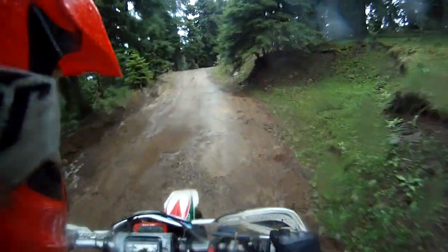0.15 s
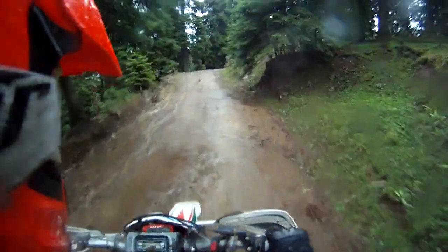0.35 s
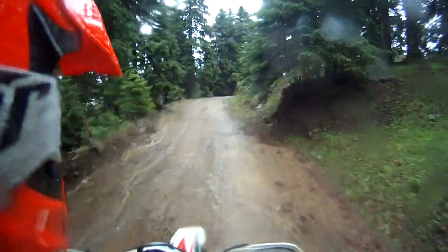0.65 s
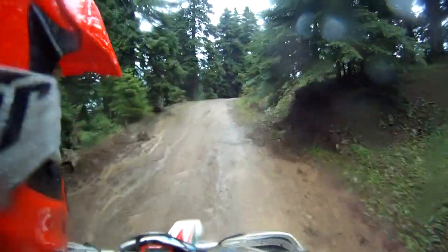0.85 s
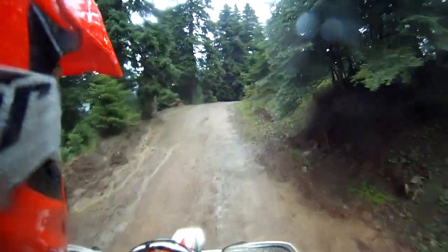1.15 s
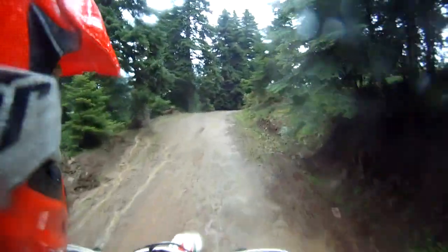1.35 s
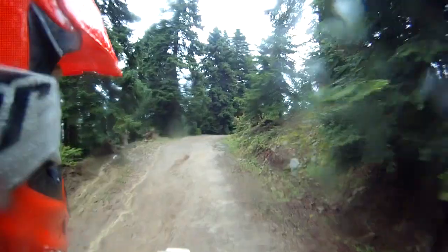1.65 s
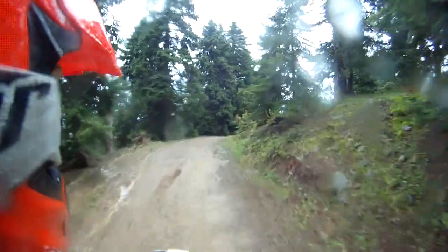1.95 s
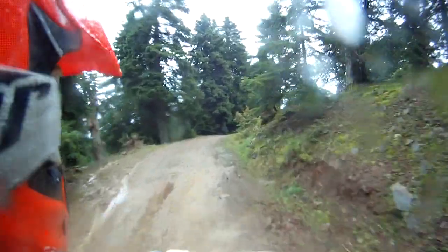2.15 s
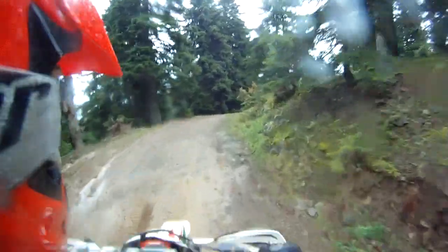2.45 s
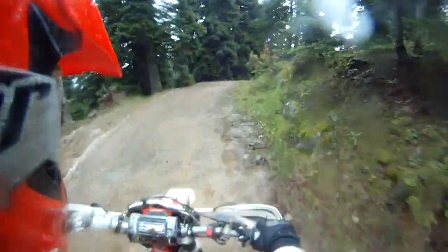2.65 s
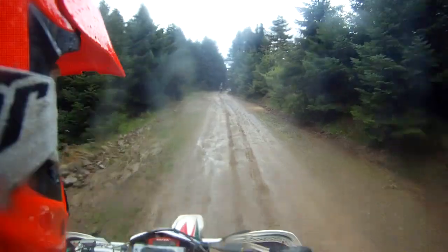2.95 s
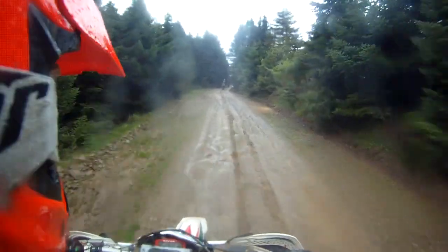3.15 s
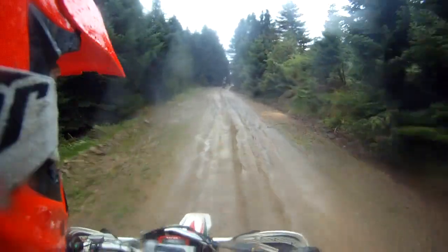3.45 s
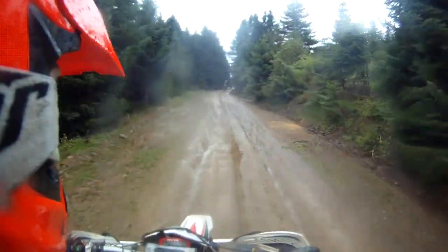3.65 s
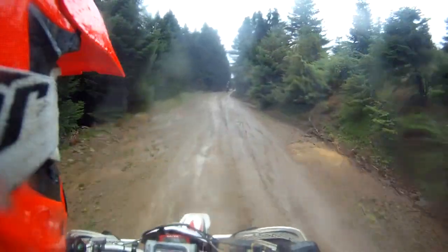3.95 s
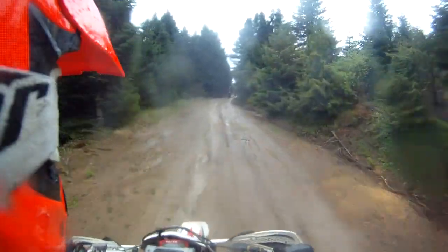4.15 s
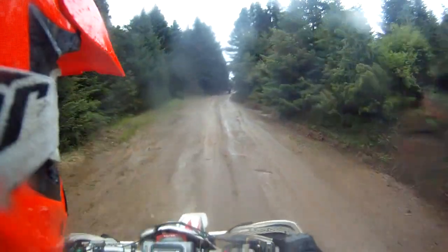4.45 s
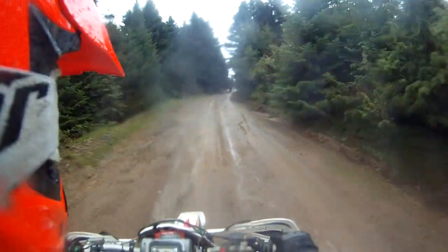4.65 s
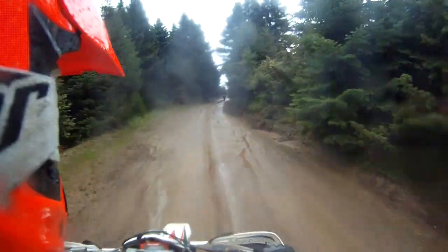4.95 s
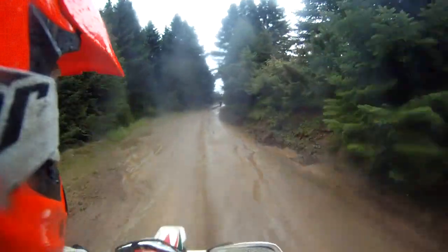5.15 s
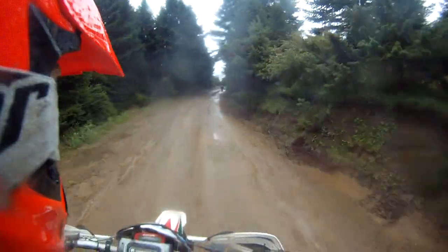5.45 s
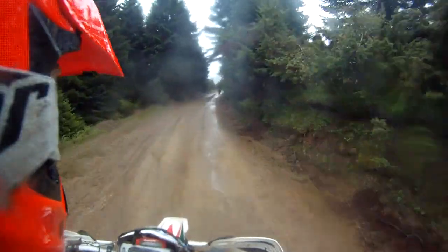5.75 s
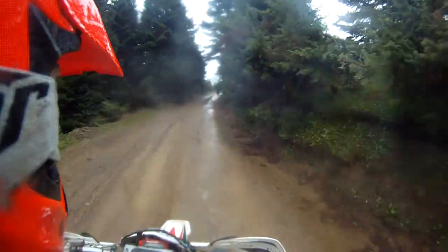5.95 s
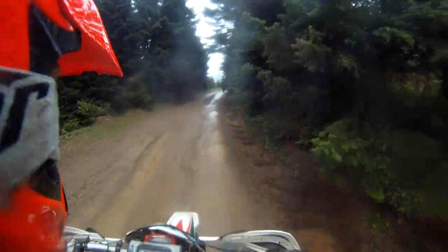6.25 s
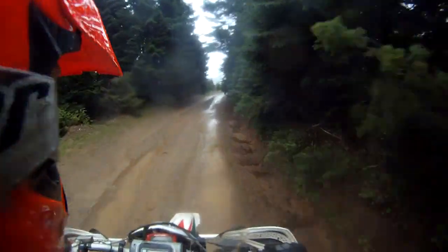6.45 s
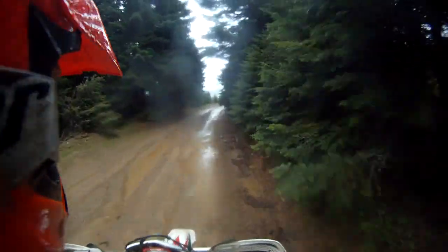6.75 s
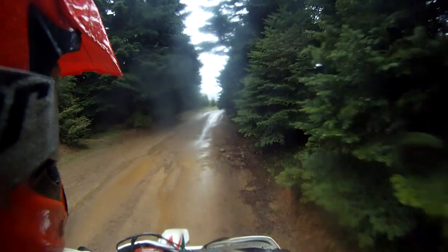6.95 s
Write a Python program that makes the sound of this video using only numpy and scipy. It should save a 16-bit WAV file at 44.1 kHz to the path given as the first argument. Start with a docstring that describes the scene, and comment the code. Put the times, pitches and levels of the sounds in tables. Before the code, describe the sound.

A trail bike rides through wet woods. At first its engine sputters and revs in short bursts over low wind rumble and faint hiss. Then the ride suddenly quickens: tyres hiss and drone, the helmet edge sings in breathy gusts, and drops and spray tap the boxed-in helmet microphone. A final throttle pull roars, then eases. Trees return a short diffuse echo.

```python
"""Dirt bike in wet woods

A two-stroke on a forest track, heard from a helmet camera in a waterproof case; faster from 2.85 s.
The engine is one pulse per turn ringing pipe and airbox: it pops, coasts, then pulls again.
Filtered noise makes the wind, the singing helmet edge and the tyre hiss; sines make the knob drone.
Drops are short bursts of force that ring the case wall."""
import sys
import numpy as np
from scipy import signal
from scipy.fft import rfft, irfft, next_fast_len
from scipy.io import wavfile
from scipy.ndimage import uniform_filter1d, map_coordinates

SR = 44100
rng = np.random.default_rng(int(sys.argv[2]) if len(sys.argv) > 2 else 0)


def generate_wav(sig):
    """Save sig (samples, or channels by samples) to the path in sys.argv[1] as 16-bit PCM at SR."""
    pcm = np.round(np.clip(np.atleast_2d(sig).T, -1, 1) * 32767).astype(np.int16)
    wavfile.write(sys.argv[1], SR, pcm)


N = 312669
TIME = np.arange(N) / SR

# resonances and notches of the camera case: f/Hz, width/Hz, level/dB
CASE_MODES = [(297, 17, 3.5), (940, 68, 2), (1253, 51, 6), (1802, 404, 4.5), (2657, 146, 4.5),
              (3557, 112, 6), (4720, 165, 3.5), (6004, 385, -15.5), (7370, 210, 3), (8460, 123, 8),
              (9230, 120, 5.5), (10160, 130, 4), (11490, 420, -16), (12290, 220, -22.5), (14470, 350, 9.5)]

# strength of the eddies at the case, before their flutter: t/s, level/dB
BUFFET_LEVEL = [(0.0, -43), (0.15, -36), (0.78, -39), (1.02, -31.5), (1.14, -42.5), (1.38, -30.5),
                (1.53, -42), (2.19, -39.5), (2.64, -35), (2.76, -43), (2.88, -35.5), (3.36, -37.5),
                (3.51, -34.5), (4.35, -33.5), (4.62, -41), (5.76, -41), (6.09, -34), (6.45, -34.5),
                (6.84, -44.8), (7.08, -36)]
# colour of the slow eddies: f/Hz, level/dB
EDDY_COLOUR = [(6, -51), (16, -1.5), (28, 1.5), (48, 1), (56, -6.5), (66, -30), (120, -46), (400, -78)]
# colour of the air rush: f/Hz, level/dB
RUSH_COLOUR = [(40, 0), (90, 4.5), (140, -2.5), (210, -4.5), (400, -10), (800, -17), (1500, -24),
               (5000, -57)]
# resonances of the helmet's edge: f/Hz, level/dB
EDGE_COLOUR = [(1100, -31), (1450, -10.5), (1620, -1.5), (1830, -1), (1960, -2), (2120, -17.5),
               (2600, -13.5), (8000, -32.5), (10200, -15.5), (12000, -31), (13850, -19.5), (15000, -38)]
# gusts that make the edge sing: t/s, length/s, starting level/dB before rise and flutter
EDGE_GUSTS = [(2.828, 0.18, -35.5), (3.102, 0.25, -35), (3.488, 0.39, -34), (3.91, 0.5, -33),
              (4.375, 0.19, -35), (4.679, 0.35, -36.5), (5.283, 0.043, -42), (5.36, 0.048, -33),
              (5.463, 0.047, -34.5), (5.595, 0.16, -40), (6.175, 0.068, -34), (6.355, .38, -41),
              (6.89, .07, -39.5)]

# hiss of the wet track, before its flutter: t/s, level/dB
WET_LEVEL = [(0, -53), (1.4, -54.5), (2.84, -52), (2.88, -45), (4.3, -44), (5.8, -46), (6.3, -42.5),
             (7.09, -47.5)]
# colour of the tyre hiss: f/Hz, level/dB
HISS_COLOUR = [(200, -19), (600, -3), (1000, -1), (1500, 1), (2300, -1.5), (3100, -1), (4200, -7.5),
               (5500, -14), (8000, -15.5), (15000, -51)]
# colour of the fine spray: f/Hz, level/dB
SPRAY_COLOUR = [(2000, -44), (5000, -7), (7000, -4.5), (9000, 3), (11000, 4), (14000, -3.5), (15200, 0)]
# beat of the tyre knobs, before its drift: t/s, f/Hz
TREAD_BEAT = [(2.87, 46.6), (3.4, 47.88), (3.8, 45.6), (4.1, 45.88), (4.6, 44.3), (5.2, 45.23), (5.6, 44.5),
              (6.35, 46.1), (7.09, 45.3)]
# harmonics of the knob beat: multiple, relative level/dB
TREAD_HARMONICS = [(2, 1.5), (3, 2), (4, -2), (5, -6.5), (7, -3.5), (8, -9), (13, -7.5)]

# drops on the case: t/s, peak level/dB, pitch f/Hz, thud weight near 1 kHz/dB, snap weight near 6 kHz/dB
CASE_DROPS = [(0.458, -31.5, 2760, -10, -24), (1.184, -23.5, 1590, 11, -41), (1.226, -35, 1040, 10, -24),
              (1.316, -32, 1600, 11, -29), (1.484, -21.5, 2530, -3, -22), (1.522, -20, 2020, 1.5, -41),
              (2.008, -18.5, 1980, -6.5, -49), (2.032, -33, 1990, 2, -34), (2.259, -25.5, 3460, -21, -12),
              (2.439, -26, 1400, -6, -36), (2.489, -30.5, 1680, 6, -14), (2.76, -23, 5100, -3.5, -6),
              (2.858, -23, 1850, 2, -26), (2.942, -18, 1660, -1, -17), (2.975, -11, 1580, -14.5, -35.5),
              (3.064, -6.5, 4300, -12, -5), (3.098, 1.5, 3450, -12.5, -22), (3.13, -22.5, 2520, -21, -12),
              (3.188, -20.5, 1580, 1, -14), (3.506, -23, 1950, -5, -18), (3.586, -15.5, 1680, -14, -29),
              (3.609, -23, 5100, -20, -1), (3.738, -8.5, 2210, -7.5, -7), (4.013, -15.5, 1650, 1.5, -44),
              (4.066, -21, 1540, 23, -23), (4.118, -20, 3500, -13, -15), (4.383, -13.5, 1790, 0.5, -41),
              (4.584, -25, 900, 17, -25), (5.245, -20, 1620, -10, -17), (5.301, -16, 2040, -7.5, -20),
              (5.621, -28, 3520, -8, -11), (6.548, -20, 1600, -10, -26), (6.718, -18, 2550, -10.5, -33)]

# engine speed, before its drift: t/s, firing rate f/Hz
FIRING_RATE = [(0, 52.5), (.4, 52.7), (.64, 61), (.8, 57.5), (.95, 53), (2.05, 54.3), (2.82, 52.5),
               (2.87, 64), (3.4, 64.4), (4, 61.8), (5.65, 59.3), (6.44, 64), (7.09, 60)]
# twists of the throttle: t/s, hold/s, opening 0-1
THROTTLE_TWISTS = [(-.1, 0.68, .42), (.45, 0.17, 0.94), (.95, 0.225, 0.57), (5.69, .79, .45),
                   (5.78, .67, 0.96)]
# runs of hard firing on every second turn under light load: t/s of the first, length/s, mean level/dB
HARD_POPS = [(.032, .055, -28.5), (.144, .135, -29), (.316, .09, -29.5), (.429, .092, -25.5),
             (.553, .05, -29), (0.637, .02, -29), (1.008, .055, -30.5), (1.103, .06, -28.5),
             (1.608, .02, -34), (1.745, .02, -32.5), (1.904, .02, -35), (2.054, .02, -36),
             (2.474, .02, -35), (5.752, .02, -32), (5.801, .02, -27.5), (5.848, .09, -26.5),
             (6.952, .05, -33.5)]
# colour of the exhaust pipe: f/Hz, level/dB
PIPE_COLOUR = [(40, -30), (120, -11.5), (178, 2), (215, -0.5), (260, -4.5), (305, -11), (360, -10),
               (435, -3.5), (540, -11.5), (630, -11), (780, -23), (920, -13.5), (1100, -31), (1500, -19.5),
               (6000, -56)]
# colour of the rasping gas: f/Hz, level/dB
RASP_COLOUR = [(300, -6), (900, -19), (1300, 1.5), (1800, -7), (3000, -8.5), (5000, -2), (7200, -4),
               (9000, -22), (12000, -0.5), (15000, -32)]
# colour of the air drawn into the intake: f/Hz, level/dB
DRAUGHT_COLOUR = [(100, -13), (200, -1.5), (260, -3), (450, -8.5), (1500, -40)]
# intake resonances: f/Hz, level/dB, 60 dB decay/s
AIRBOX_MODES = [(198, -18, 0.1), (230, -24, 0.028), (430, -25, .05)]
# shaking of the running engine: multiple of the firing rate, level/dB before its drift
SHAKE_ORDERS = [(2, -57.5), (5, -62)]

TOP_HZ = 15400  # band limit of the camera
FAST_FROM_S, FAST_RISE_S = 2.85, 0.0085  # start of the fast stretch and length of the ramp into it

RUSH_DB, RUSH_FAST_DB = -56.5, 6  # air rush; added at speed
RUSH_FOLLOWS = 0.096  # share of the eddies' dB swings that the rush follows
GUST_RISE_S, GUST_FALL_S = 0.037, 0.025  # time constants
GUST_SAG_DB_PER_S = 29.5
EDGE_CALM_DB = -49.5  # floor under the gusts, before flutter

DRONE_DB = -50.5  # knob drone at speed
SPRAY_DB = -8.5  # relative to the hiss

PATTER_DB, PATTER_SPREAD_DB, PATTER_FAST_DB = -47.5, 14.5, 6.5  # faintest tiny drop; range above; at speed
HARD_BRIGHTENS, PLAIN_DROP_DB = 0.082, -8  # dB of treble per dB above the plain drop's peak

OPEN_S, SHUT_S = 0.044, 0.046  # time constants of the engine's answer to the grip
COAST_DB, COAST_FAST_DB, PULL_DB = -48, 2.5, 15.5  # firing when coasting; added at speed; at full throttle
BURN_SCATTER_S = 0.00083  # random shift of a firing at full throttle, standard deviation
ROAR_DB = -33  # intake draught at full throttle, relative to the puffs


def amp(db):
    """Decibels to gain."""
    return 10 ** (np.asarray(db) / 20)


def unit(x):
    """Scale to rms 1."""
    return x / np.sqrt(np.mean(x ** 2) + 1e-20)


def along(points, hz):
    """Read a colour table on a log frequency axis."""
    f, v = np.transpose(points)
    return np.interp(np.log(hz + 1), np.log(f + 1), v)


def curves(rows):
    """One value per sample for each column after the time."""
    s, *cols = np.transpose(rows)
    return [np.interp(TIME, s, c) for c in cols]


def wobble(rate):
    """A smooth random curve with rate knots a second."""
    knots = rng.standard_normal(int(N * rate / SR) + 4)
    steps = np.arange(len(knots) * 6) / 6
    smooth = map_coordinates(knots, [steps])
    return np.interp(TIME * rate, steps, smooth)


def held(s, length, rise, fall):
    """Envelope 0-1 that rises from time s and falls away after length seconds."""
    opening = 1 - np.exp(-np.maximum(TIME - s, 0) / rise)
    closing = np.exp(-np.maximum(TIME - s - length, 0) / fall)
    return opening * closing


def at_speed(t):
    """0 on the slow stretch, 1 on the fast one."""
    return np.clip((t - FAST_FROM_S) / FAST_RISE_S, 0, 1)


def case_db(hz):
    """Colour that the resonating camera case lends to noise and ringing."""
    return sum(db * np.exp(-.5 * ((hz - centre) / width) ** 2) for centre, width, db in CASE_MODES)


def ring(colour, spread, knee_hz, size=4096):
    """Impulse response of peak 1 through the case; lows under the knee lag by up to spread seconds."""
    hz = np.fft.rfftfreq(size, 1 / SR)
    # folding the cepstrum gives minimum phase: the ring starts at the blow
    cepstrum = irfft(np.log(amp(colour(hz) + case_db(hz)) + 1e-6))
    cepstrum[1:size // 2] *= 2
    cepstrum[size // 2 + 1:] = 0
    lag = 2 * np.pi * spread * knee_hz * np.arctan(hz / knee_hz)
    answer = irfft(np.exp(rfft(cepstrum) - 1j * lag))
    return answer / np.abs(answer).max()


def noise(spectrum, band, drive=1):
    """Noise stirred by drive, coloured by spectrum and case, with rms 1 inside the band."""
    size = next_fast_len(N + 8192)
    hz = np.fft.rfftfreq(size, 1 / SR)
    z = rfft(rng.standard_normal(N) * drive, size) * amp(along(spectrum, hz) + case_db(hz))
    in_band = irfft(z * (hz > band[0]) * (hz < band[1]), size)[:N]
    return irfft(z, size)[:N] / in_band.std()


def add(track, s, sound):
    """Mix a sound into the track at time s."""
    part = track[max(round(s * SR), 0):][:len(sound)]
    part += sound[:len(part)]


def helmet_edge():
    """At speed each gust makes the edge resonate in fuzzy bands, then sags."""
    gusts = np.max([amp(db - GUST_SAG_DB_PER_S * np.maximum(TIME - s, 0))
                    * held(s, length, GUST_RISE_S, GUST_FALL_S)
                    for s, length, db in EDGE_GUSTS], axis=0)
    strength = np.hypot(gusts, amp(EDGE_CALM_DB)) * amp(0.76 * wobble(25))
    return at_speed(TIME) * strength * noise(EDGE_COLOUR, (1550, 2050))


def wind():
    """Slow eddies shake the case, air rushes past and the helmet's edge sings."""
    buffet_db, = curves(BUFFET_LEVEL)
    eddies = noise(EDDY_COLOUR, (15, 65))
    # even out the eddies' own swings over 0.1 s so the buffet curve sets the level
    eddies /= np.sqrt(np.abs(uniform_filter1d(eddies ** 2, size=4410)) + 0.055)
    buffets = amp(buffet_db + 1.6 * wobble(18)) * eddies
    swing_db = RUSH_FOLLOWS * (buffet_db - buffet_db.mean())
    rush_db = RUSH_DB + RUSH_FAST_DB * at_speed(TIME) + swing_db
    rush = amp(rush_db) * noise(RUSH_COLOUR, (70, 160))
    return buffets + rush + helmet_edge()


def tyres():
    """At speed the knobs drone on the dirt; the wet surface hisses and throws fine spray."""
    wet_db, = curves(WET_LEVEL)
    tread_hz, = curves(TREAD_BEAT)
    angle = 2 * np.pi * np.cumsum(tread_hz * (1 + 0.01393 * wobble(14))) / SR
    drone = unit(sum(amp(db + 2.3 * wobble(8.6)) * np.sin(round(k) * angle)
                     for k, db in TREAD_HARMONICS))
    # hiss and spray share the slower flutter; each adds a fast one of its own
    splash = amp(1.4 * wobble(45) + 0.71 * wobble(12))
    hiss = noise(HISS_COLOUR, (2200, 3800), splash * amp(2.0 * wobble(900)))
    spray = amp(SPRAY_DB) * noise(SPRAY_COLOUR, (8000, 11000), splash * amp(2.4 * wobble(1500)))
    return amp(DRONE_DB) * at_speed(TIME) * drone + amp(wet_db) * (hiss + spray)


def drop(peak_db, pitch_hz, thud_db, snap_db):
    """A drop bends the case wall, rings one spot of it and splatters for a few milliseconds."""
    hard_db = HARD_BRIGHTENS * max(peak_db - PLAIN_DROP_DB, -8)
    colour = [(100, thud_db - 27), (600, thud_db - 13), (1150, thud_db), (2300, -7), (3600, -5.5),
              (4700, snap_db / 2), (6000, snap_db + 9.5), (8300, hard_db - 12.5), (15000, hard_db - 23.5)]
    # soft, dull blows ring longer than sharp ones
    dull = np.clip(thud_db / 12, 0, 1)

    def wall_db(hz):
        """The blow's colour plus a resonant peak at the struck spot."""
        spot = (8 + 7 * dull) / (1 + ((hz / pitch_hz - 1) / 0.077) ** 2)
        return along(colour, hz) + spot

    knock = ring(wall_db, spread=0.001151, knee_hz=5960, size=2048)
    # one sharp blow, then a longer faint splatter and a shorter strong one
    t = TIME[:1024]
    force = amp(-25 - 60 * t / 0.026) * rng.standard_normal(1024)
    force += amp(-13.0 - 60 * t / 0.0058) * rng.standard_normal(1024)
    force[0] += 1
    tick = signal.fftconvolve(force, knock)
    return amp(peak_db) * tick / np.abs(tick).max()


def drops():
    """Single drops strike the case among a random patter of tiny ones, louder at speed."""
    track = np.zeros(N)
    for s, *blow in CASE_DROPS:
        add(track, s, drop(*blow))
    for when, pitch, weight in rng.random((60, 3)):
        s = when * N / SR
        db = PATTER_DB + PATTER_SPREAD_DB * weight ** 2 + PATTER_FAST_DB * at_speed(s)
        add(track, s, drop(db, 1500 + 5000 * pitch, thud_db=-11, snap_db=-12))
    return track


def trees(sound, t60=0.12, count=24):
    """Scattered echo of the trunks; it changes as the bike moves past them."""
    t = TIME[:4096]
    echo = np.zeros(N)
    hop = N // count + 1
    padded = np.pad(sound, (hop, 2 * hop))
    # overlapping slices crossfade from one random tail to the next
    for k in range(count + 1):
        tail = rng.standard_normal(len(t)) * amp(-60 * t / t60) * (t > .004)
        tail /= np.linalg.norm(tail)
        piece = signal.fftconvolve(padded[k * hop:(k + 2) * hop] * np.hanning(2 * hop), tail)
        add(echo, max(k - 1, 0) * hop / SR, piece if k else piece[hop:])
    return echo


def crank_turns():
    """Turns of the crank so far, one firing each, eased so that hard pops fall on whole turns."""
    rate, = curves(FIRING_RATE)
    turns = np.cumsum(rate * (1 + .008 * wobble(16))) / SR
    pop_s = np.transpose(HARD_POPS)[0]
    offset = np.unwrap(np.interp(pop_s, TIME, turns) % 1, period=1)
    return turns - np.interp(TIME, pop_s, offset)


def firings(turns, grip, level_db):
    """One pulse per turn; under load the charge burns a little early or late."""
    at = np.flatnonzero(np.diff(np.floor(turns)) > 0)
    scatter, timing = rng.standard_normal((N // 2, 2))[:len(at)].T
    # a strong firing leaves spent gas behind, so the next one is weaker
    alternation = 1.4 * (-1) ** np.arange(len(at))
    size_db = level_db[at] + alternation + 1.8 * scatter
    for s, length, db in HARD_POPS:
        first = np.abs(TIME[at] - s).argmin()
        run = slice(first, np.searchsorted(TIME[at], s + length), 2)
        size_db[run] = db + 1.1 * scatter[run]
    late = np.round(BURN_SCATTER_S * SR * grip[at] * timing).astype(int)
    kicks = np.zeros(N)
    kicks[np.clip(at + late, 0, N - 1)] = amp(size_db)
    return kicks


def intake(kicks, puffs, grip, throttle):
    """Firing pulses and turbulent draught ring the airbox, which booms as the throttle opens."""
    t = TIME[:4096]
    gulp = sum((-1) ** k * amp(db - 60 * t / t60) * np.sin(2 * np.pi * hz * t)
               for k, (hz, db, t60) in enumerate(AIRBOX_MODES))
    draught = amp(ROAR_DB) * grip * puffs * noise(DRAUGHT_COLOUR, (100, 600))
    return signal.fftconvolve(kicks * (0.14 + 0.41 * throttle) + draught, gulp)[:N]


def engine():
    """Each firing rings pipe and airbox, echoes off the trees and puffs out rasping gas."""
    grip = np.max([opening * held(s, length, OPEN_S, SHUT_S)
                   for s, length, opening in THROTTLE_TWISTS], axis=0)
    level_db = COAST_DB + COAST_FAST_DB * at_speed(TIME) + PULL_DB * grip
    throttle = np.clip((level_db + 40.5) / 12, 0, 1)
    turns = crank_turns()
    kicks = firings(turns, grip, level_db)
    pipe = signal.fftconvolve(kicks, ring(lambda hz: along(PIPE_COLOUR, hz), spread=.0015, knee_hz=493))[:N]
    t = TIME[:4096]
    puff = amp(-60 * t / 0.093) * (1 - np.exp(-t / 0.0029))
    puffs = signal.fftconvolve(kicks, puff)[:N]
    # with the throttle open the separate pops merge into a growl
    churn = amp(-16.5 + 7.1 * throttle) * noise(PIPE_COLOUR, (100, 2000))
    rasp = amp(-12.5) * noise(RASP_COLOUR, (500, 15000))
    gas = puffs * (churn + rasp)
    boom = intake(kicks, puffs, grip, throttle)
    direct = amp(-3.0 - 1.5 * throttle) * pipe
    echo = amp(-7.5 + 6.9 * throttle) * trees(pipe)
    shake = sum(amp(db + 3.8 * wobble(7)) * np.sin(2 * np.pi * round(k) * turns)
                for k, db in SHAKE_ORDERS)
    # pipe and boom push the opposite way to the rest
    return gas - boom - direct + echo + shake


def scene():
    """Everything reaches the one microphone in the case."""
    return (wind() + tyres() + drops() + engine())[None]


def record(dry):
    """The camera clips at full scale, then cuts steeply above its band limit."""
    size = next_fast_len(N + 8192)
    hz = np.fft.rfftfreq(size, 1 / SR)
    clipped = rfft(np.clip(dry, -1, 1), size)
    return irfft(clipped / (1 + (hz / TOP_HZ) ** 160), size)[:, :N]


dry = scene()
out = record(dry)
generate_wav(out)
```